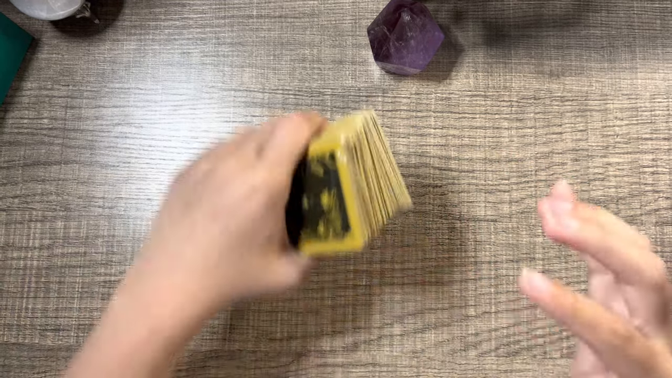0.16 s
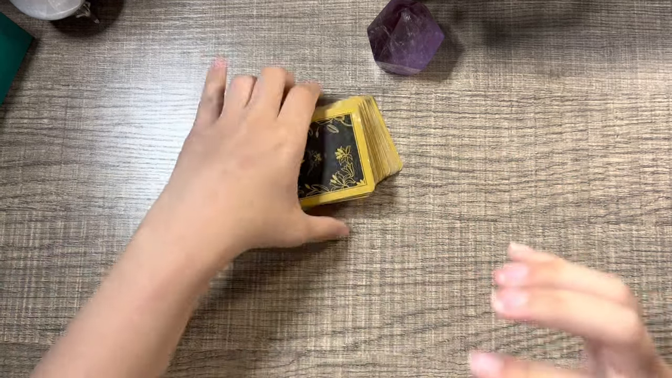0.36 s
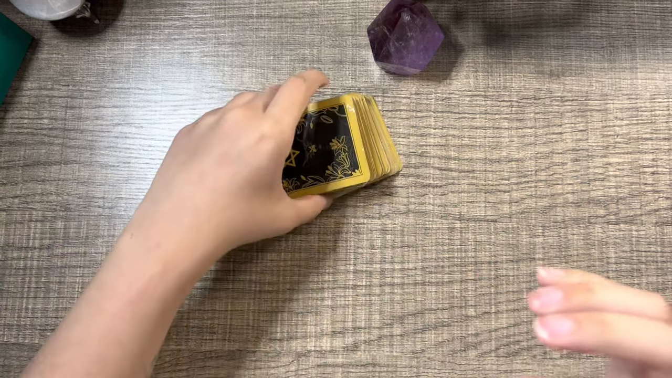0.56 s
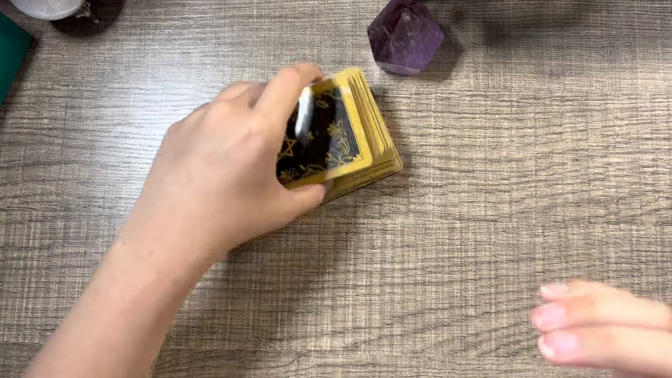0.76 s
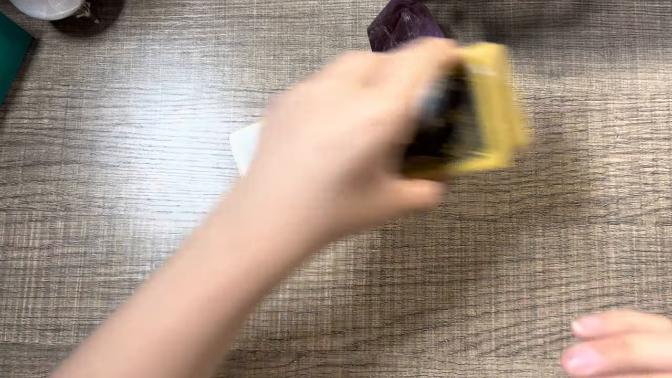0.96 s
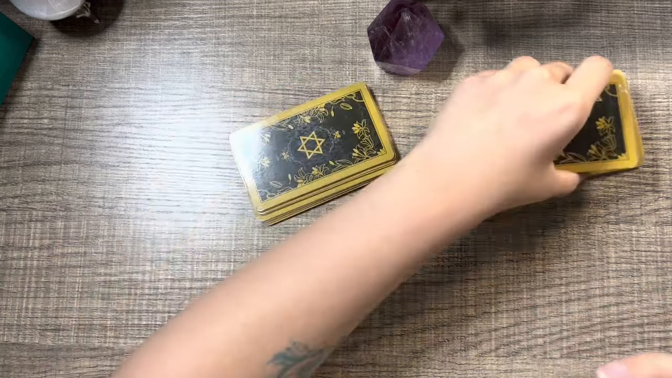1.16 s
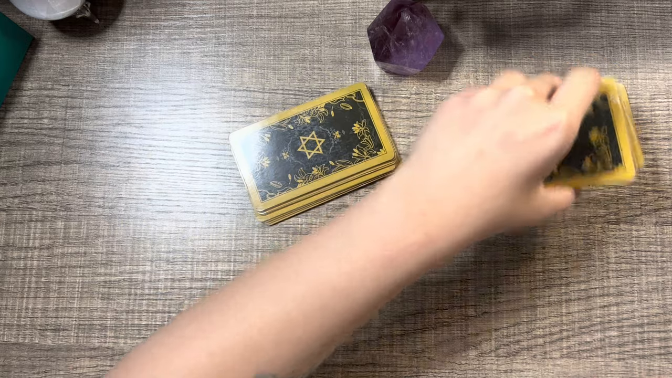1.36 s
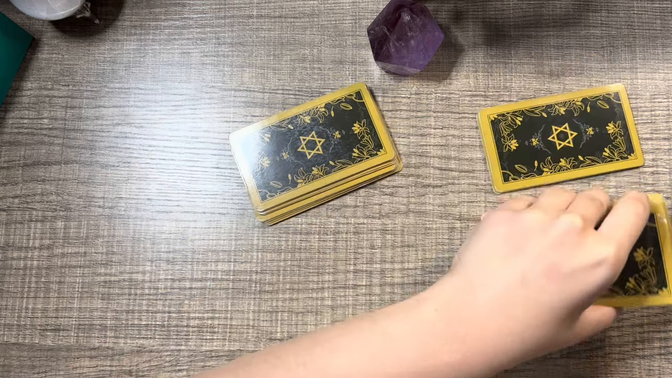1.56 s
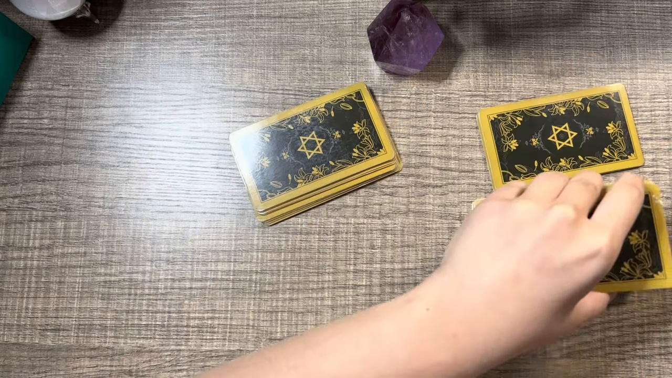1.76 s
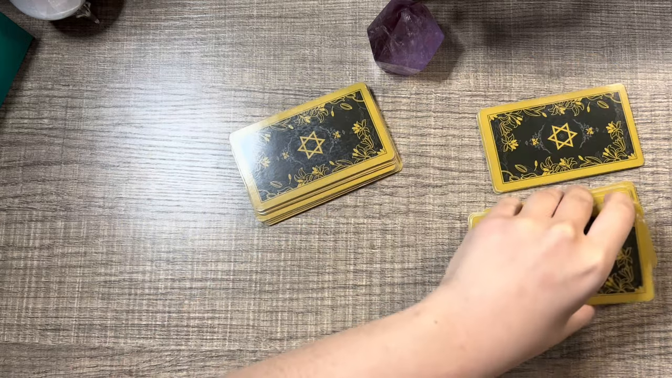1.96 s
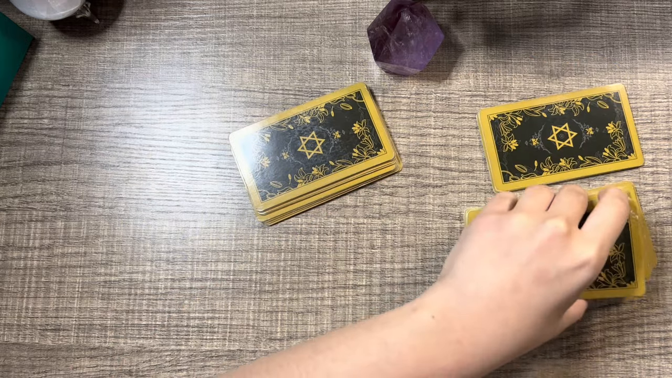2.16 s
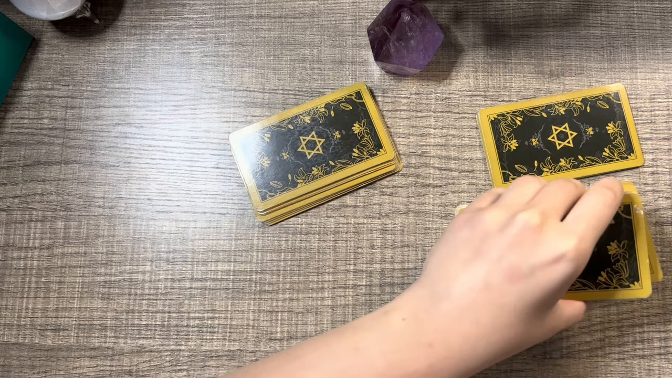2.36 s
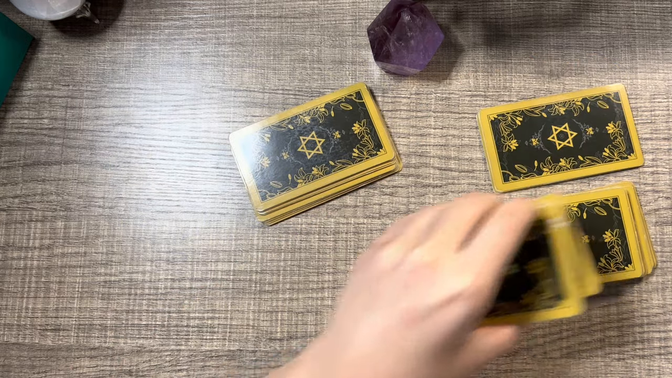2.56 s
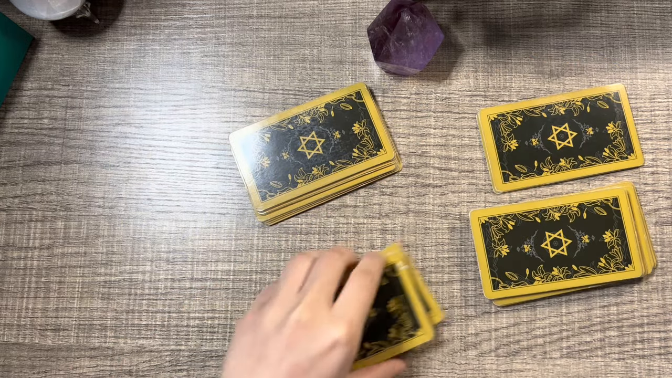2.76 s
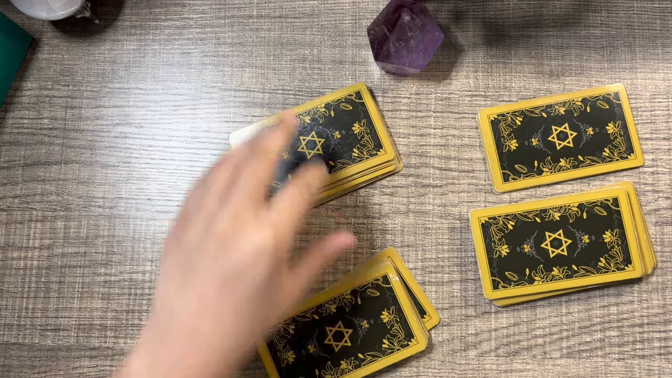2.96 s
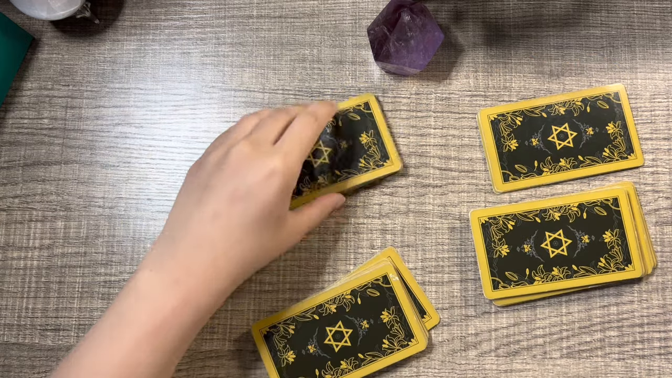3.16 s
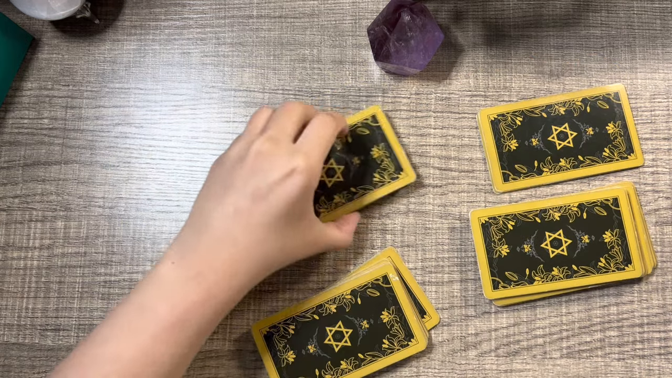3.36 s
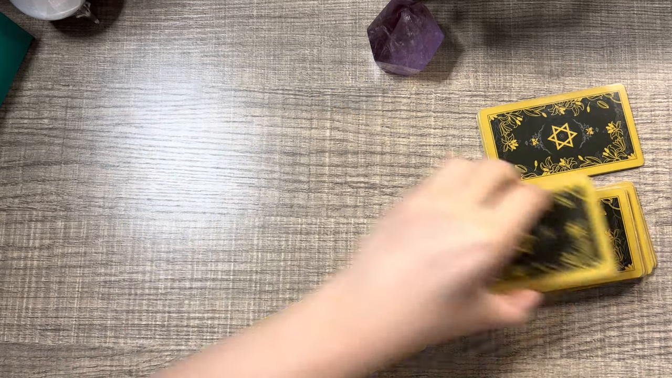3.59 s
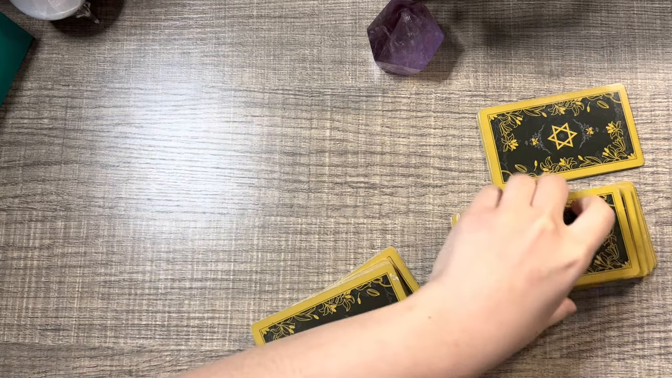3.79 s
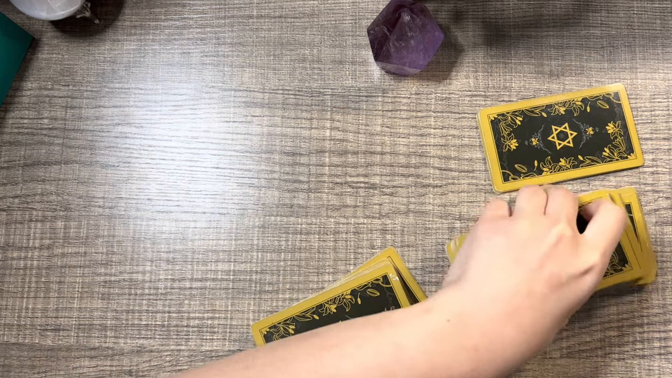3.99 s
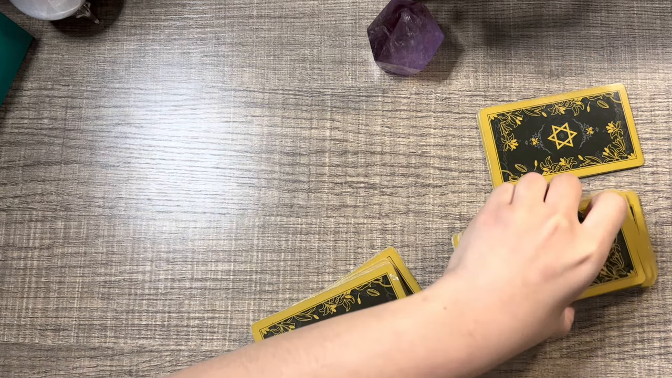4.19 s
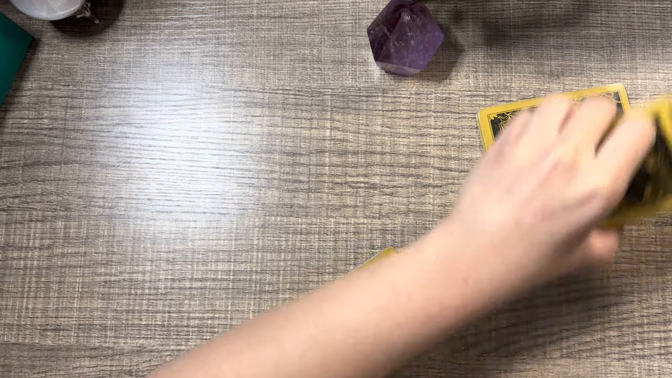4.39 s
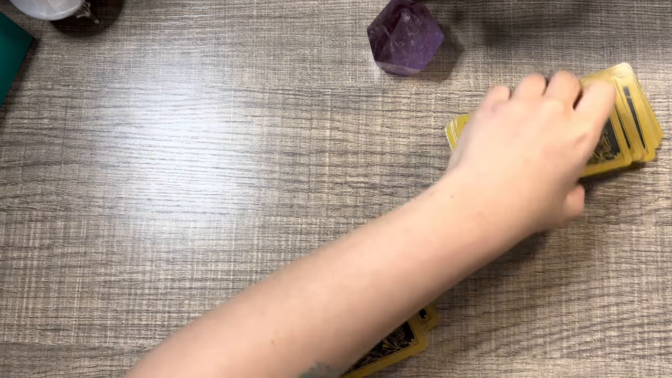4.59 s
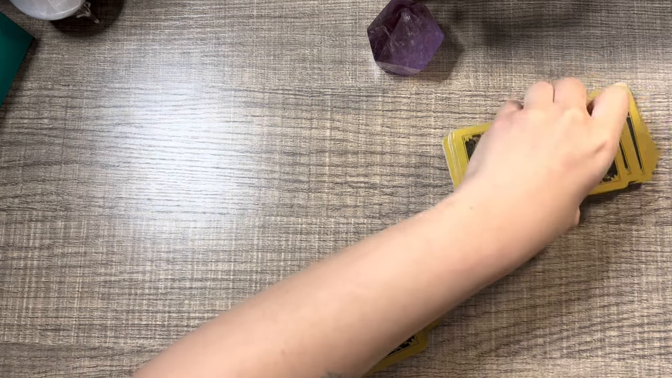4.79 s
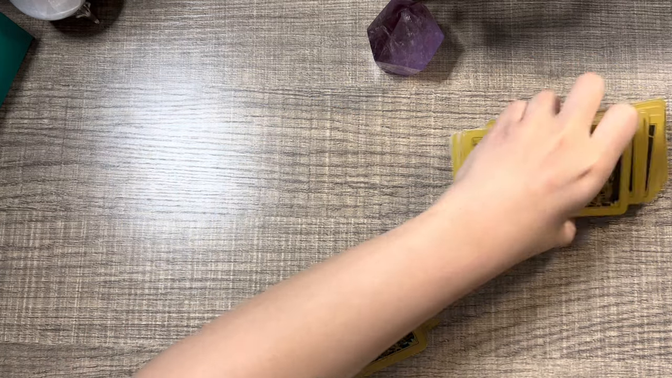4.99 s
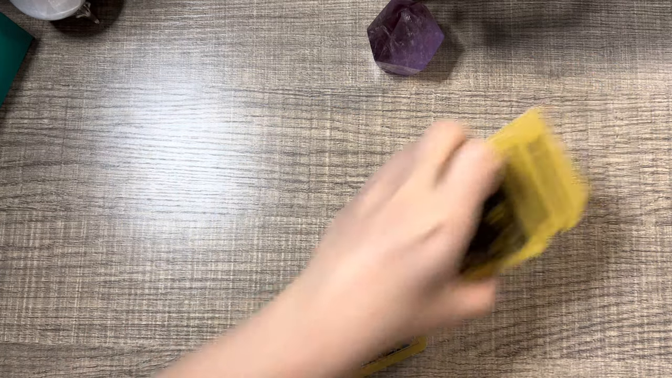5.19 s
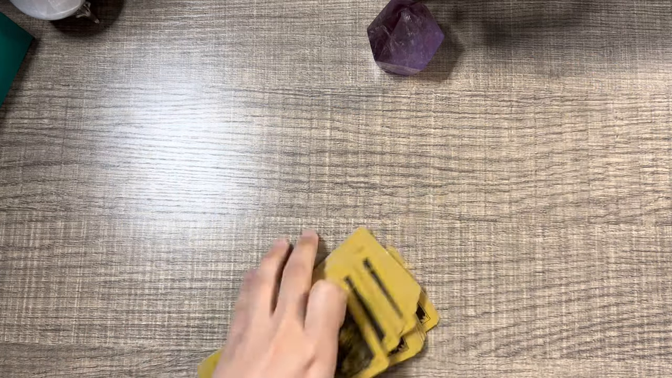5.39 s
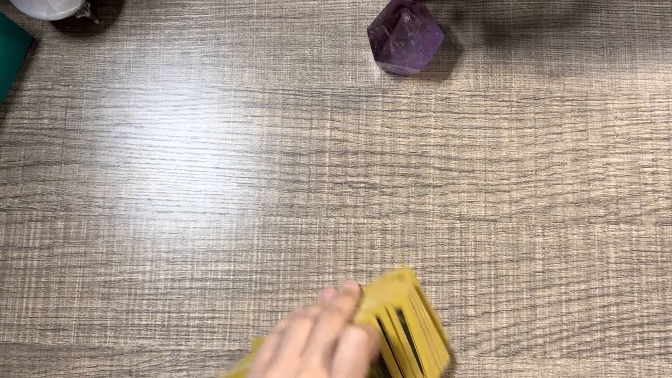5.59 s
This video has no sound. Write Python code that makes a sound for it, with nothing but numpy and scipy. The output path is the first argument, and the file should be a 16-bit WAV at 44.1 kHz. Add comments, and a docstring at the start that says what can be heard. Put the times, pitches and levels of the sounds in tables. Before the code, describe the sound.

Close stereo pickup of playing-card packs handled on a wooden table in a small quiet room. A sharp clack and scrape come first, then isolated slaps as packs are laid down, a near-silent gap, and denser knocks and slides as they are gathered, ending with a strong thud. A faint ventilation hum and low swelling rumble lie behind.

```python
"""Playing cards handled on a wooden tabletop

A hand sets packs of cards down, slides them and gathers them up, close under two microphone ports.
Card edges tick as filtered impulses with a papery noise burst; each pack's weight excites the board's
decaying modes; sliding friction is gritty noise under swelling envelopes; a small room answers with decaying noise.
Behind them a far ventilation fan hums, a low rumble swells, and a faint ring near 1 kHz dies away."""
import sys
import numpy as np
from scipy import signal
from scipy.fft import rfft, irfft, next_fast_len
from scipy.io import wavfile
from scipy.ndimage import uniform_filter1d, map_coordinates

SR = 44100
rng = np.random.default_rng(int(sys.argv[2]) if len(sys.argv) > 2 else 0)


def store_pcm(level_fs):
    """Save levels as 16-bit WAV."""
    pcm = np.round(np.clip(level_fs, -1, 1) * 32767).astype(np.int16)
    wavfile.write(sys.argv[1], SR, np.atleast_2d(pcm).T)


N = 248937  # length in samples
TIME = np.arange(N) / SR  # s

# Card edges meeting wood or card. Each row: start in seconds, snap level in dB,
# treble lift in dB per octave, level of the pack's body in dB, buzz t60 in seconds.
EDGE_TICKS = [(.0526, -46, 6.5, -30, 0.021), (.0827, -46, 10, -32, .012), (.245, -52, -13, -29, 0.013),
              (.276, -37.5, 6, 6, 0.034), (.306, -10.5, -6.5, -8, 0.015), (.3235, -27.5, 4, -14, 0.033),
              (.3633, -34, 32, -25, .018), (.476, -42, -7.5, -4, 0.036), (.5095, -34.5, -6.5, -24, 0.048),
              (.523, -36.5, -11.5, -18, 0.042), (.846, -41, -17.5, 11, 0.014),
              (.859, -26.5, -3.5, -18.5, 0.014), (1.1291, -46, -23, 9, 0.018), (1.144, -12, 4, 6.5, 0.028),
              (1.149, -28.5, -11.5, -9, 0.041), (1.154, -31, -6, 11, 0.018), (1.6451, -29, -3.5, 11, 0.027),
              (1.673, -33, -3.5, -5, 0.017), (2.7708, -24.5, -1.5, -3, 0.028),
              (2.7912, -30.5, -1, -8, 0.014), (2.7966, -24, -5.5, 1.5, 0.017),
              (3.079, -45.5, -11.5, -10, 0.015), (3.124, -34, 11, -8, 0.03), (3.134, -35, 3.5, -15, 0.019),
              (3.144, -29, -4, -21, 0.022), (3.222, -48.5, -8, -8, .02), (3.241, -40, -10.5, -16, 0.039),
              (3.258, -40, -10, -6, .043), (3.6578, -31, -0.5, 6, 0.022), (3.6779, -21.5, 2, -4, 0.029),
              (3.7505, -45.5, -7, -11, 0.032), (3.7745, -44, -8, -6, 0.032), (3.7849, -44, -8, -20, 0.042),
              (3.8361, -36, -12, -23, 0.017), (3.95, -40, -1, -3, .045), (3.968, -31, -1.5, -13, 0.031),
              (3.9856, -35.5, -7, -5, .045), (4.0571, -25.5, -1.5, -6, .035),
              (4.5142, -25.5, -2, -4, 0.051), (4.5192, -21, -15, 13.5, 0.019), (4.533, -34, 1, -7, .031),
              (4.646, -59.5, -7, -10, 0.061), (4.757, -52, -2, 14, .03), (4.784, -35.5, 6.5, -3, 0.028),
              (5.3387, -36.5, -3.5, -5, 0.025), (5.3487, -34.5, 0, -25, 0.032), (5.362, -23, -14, -1, 0.04),
              (5.372, -38, 7, -6, 0.021), (5.381, -32.5, 0.5, -17, 0.031), (5.39, -42, 5, -9, 0.023)]
# The pack's edge on the board. Each row: start in seconds, knock level in dB,
# sharpness in dB (upper modes against the knock), rise in seconds.
PACK_THUDS = [(.28, -18, -14.5, .003), (.305, -24, 7, 0.0027), (0.321, -36, 2, .002),
              (.446, -31, -8, 0.0055), (.487, -35, 0, 0.0046), (.51, -33.5, 4.5, 0.0049),
              (.848, -62, 13, 0.0009), (.859, -60.5, 12.5, 0.00093), (1.148, -45.5, 15, 0.0015),
              (1.651, -32, 3.5, 0.0027), (1.675, -27.5, -8.5, 0.0034), (1.692, -38, -26, .0038),
              (2.776, -28.5, -8, 0.0022), (2.798, -31.5, 2.5, .003), (3.085, -38, 6, 0.0022),
              (3.104, -35, -3, 0.0069), (3.264, -38.5, 12, 0.0042), (3.309, -35.5, 2, 0.0048),
              (3.676, -26, -7, 0.0024), (3.795, -45.5, 4, 0.002), (3.835, -48.5, 8, 0.0032),
              (3.961, -29.5, 1, 0.0058), (3.988, -27.5, -0.5, 0.0029), (4.058, -41, 17.5, 0.0017),
              (4.122, -36.5, -0.5, 0.006), (4.165, -40, 5.5, .0036), (4.521, -22, 2.5, 0.0032),
              (4.53, -24.5, 0.5, 0.0044), (4.65, -43, 9.5, 0.0052), (4.761, -37.5, 6.5, 0.0043),
              (4.803, -26, 8, 0.008), (4.835, -37.5, 6, 0.003), (5.344, -24, -20.5, 0.0091),
              (5.368, -12.5, -5.5, 0.0036), (5.377, -18, -3.5, .004), (5.392, -31, -9, .0022)]
# The hand's full weight bending the top. Each row: start in seconds, lowest modes in dB,
# second modes in dB, rise in seconds.
TOP_BUMPS = [(0.289, -35, -31.5, 0.0053), (.324, -24.5, -38, 0.0086), (0.472, -51, -65, .02),
             (1.689, -35.5, -44, 0.0096), (2.795, -35, -26, .008), (3.683, -30.5, -25.5, 0.013),
             (4.091, -39.5, -46, 0.017), (4.547, -29.5, -57, 0.006), (5.3705, -28, -7.5, .012),
             (5.42, -43.5, -23, 0.011)]
# Cards sliding. Each row: touch in seconds, climb to the peak in seconds, swell in dB, initial fade in
# seconds per 20 dB, scrape peak in dB, then against it fine hiss in dB and the board's shiver in dB.
# The signs of climb, swell and fade are ignored.
CARD_SLIDES = [(.0, 0.053, -5, 0.34, -70.5, -8, -1.5), (0.27, 0.038, 12, 0.0583, -36, -10, 8.5),
               (0.426, 0.083, 22, 0.0158, -42.5, -28, 11), (1.15, .012, 3.5, 0.05, -51, -4.5, 8),
               (1.561, .08, 19, -0.24, -60, -4.5, -5), (1.643, 0.011, 0, 0.03, -47, -15, 9.5),
               (2.15, 0.046, 22, 0.3, -76, -11, 6), (2.405, 0.027, 6, 0.23, -76, -13, 14),
               (2.5, 0.093, 6, -0.2, -75, -8, 10), (2.709, 0.049, 16, -1.4, -62.5, -14.5, 1),
               (2.775, 0.023, 2, -0.1, -56.5, -10, 13), (3.077, 0.027, 12.5, 0.13, -45, -20.5, 4.5),
               (3.111, 0.026, 6, 0.0482, -40, -19, -14), (3.195, 0.065, 7, 0.07, -48, -35, 6),
               (3.285, 0.06, 2, 0.14, -57, -35, 6), (3.685, 0.011, 6, 0.16, -67, -10.5, 14),
               (3.827, 0.0048, 15, 0.08, -50, -41, 0), (3.938, 0.02, 16, 0.0668, -40, -26.5, -10),
               (4.043, .012, 9, 0.0562, -41, -19, 4), (4.14, 0.043, 8, 0.1, -61.5, -42, 19.5),
               (4.515, 0.0154, 6.5, 0.0341, -36.5, -15, 19.5), (4.54, .02, 3, 0.21, -55.5, -26, 10),
               (4.739, 0.054, 16.5, 0.17, -44.5, -23, 7), (4.79, .025, 9, 0.01, -53.5, -20, 24.5),
               (4.92, 0.032, 2.5, 0.13, -58, -1.5, -15), (5.32, 0.047, 20, -0.06, -48, -7, 9),
               (5.379, 0.0089, -1, .035, -52.5, -18, 30.5), (5.47, .04, 11, .4, -71.5, 3.5, 15),
               (5.4, .24, 11.5, -4, -57, -10, -4)]

# Board modes, from the knock upwards. Each row: frequency in Hz, level in dB, t60 in seconds.
KNOCK_MODES = [(154.7, -13.5, 0.25), (188, -11.5, .12), (241.8, -0.5, 0.11)]
HIGH_KNOCK_MODES = [(282.6, -9.5, 0.081), (317.4, 0, .11), (352.4, -7.5, 0.072), (378.6, -4, 0.097)]
UPPER_MODES = [(479.2, -1, .1), (563.6, 1.5, 0.064), (677, 1.5, 0.049), (787.3, -3.5, 0.064),
               (930, -8.5, 0.074), (1009, -5, 0.06), (1393, -10.5, 0.078), (1897, -11.5, 0.081)]
# Bending modes of the whole top: a close pair that beats, then the next modes.
# Each row: frequency in Hz, level in dB, t60 in seconds.
LOWEST_MODES = [(62.5, 0, .7), (66, -2, .6)]
SECOND_MODES = [(108.4, 7, .12), (83.6, -14.5, 0.088)]
# Resonances of the pack of cards. Each row: frequency in Hz, width in Hz, level in dB.
PACK_BODY = [(1640, 1100, -5), (2110, 500, 5.5), (2580, 620, -7)]

# Spectra of a card's snap, of coated card on card, of skin on coated card, and of the fan's air noise.
# Each row: frequency in Hz, relative spectral level in dB.
SNAP_COLOUR = [(300, -30.5), (600, 2.5), (1200, -2.5), (2500, -2.5), (3500, -4.5), (5000, -2), (8000, -0.5),
               (9700, -8.5), (12500, -5), (15500, -12.5), (16400, -36.5)]
SCRAPE_COLOUR = [(260, -40), (450, 2.5), (791, -8), (1210, -11.5), (1460, -10.5), (2030, -13.5),
                 (2570, -11.5), (5730, -22), (9000, -32.5), (11700, -63.5), (19800, -120)]
HISS_COLOUR = [(3500, -40), (6000, -12), (9000, -7.5), (10500, -16.5), (11800, -2.5), (13000, -11.5),
               (15200, -8.5), (16000, -13.5), (16400, -30)]
AIR_COLOUR = [(20, -33), (30, -32.5), (52, -9), (90, -16), (125, -9.5), (150, -19), (185, -20.5),
              (240, -25), (520, -29), (685, -43.5), (1000, -36.5), (2100, -40), (2900, -54.5), (5000, -60),
              (12000, -65), (15500, -67.5), (16400, -68.5)]

# Lifts in the air noise. Each row: frequency in Hz, width in Hz, lift in dB.
DUCT_LIFTS = [(514, 56, 6), (985, 60, 1.5), (1450, 47, 5), (1890, 140, 6)]
# Motor hum. Each row: frequency in Hz, width of its noise part in Hz, rms level in dB.
MOTOR_HUM = [(120.8, 59, -52.5), (240.7, 6.1, -68), (62, 13.3, -69)]
# The swelling rumble. Each row: time in seconds, low note in dB rms, drone in dB rms.
RUMBLE_LEVELS = [(0, -47.5, -62), (.4, -67, -71), (1.5, -68.5, -67.5), (1.8, -52.5, -61.5),
                 (2.17, -45.5, -52), (2.4, -57, -58.5), (2.55, -46.5, -50.5), (2.72, -43.5, -61),
                 (2.9, -54, -57), (3.4, -52.5, -66.5), (4.0, -51, -52.5), (4.3, -67, -60.5),
                 (5.2, -59.5, -66), (5.48, -37.5, -58), (5.64, -56, -63)]
# Correlation of the air noise, then of the room. Each row: frequency in Hz, left-right likeness (1 is identical).
AIR_ALIKE = [(60, 1), (150, 0.99), (380, 0.55), (950, 0.17), (2380, 1), (5980, 0.5), (15000, 0.15)]
ROOM_LIKENESS = [(200, 0.97), (400, 1), (650, 0.075), (1200, 0.16), (2000, 0.99), (4000, 0.2), (8000, .15)]
# Decay of the room. Each row: frequency in Hz, t60 in seconds.
ROOM_DECAY = [(100, 0.12), (500, 0.33), (2000, 0.2), (6000, 0.2), (14000, 0.12)]
# The microphone ports. Each row: frequency in Hz, phase lead of the left in radians, left-right balance in dB.
MIC_PORTS = [(90, 0, 0), (250, .03, -.4), (600, .55, 1.8), (950, -.55, .2), (1500, .15, .2), (3600, .4, .4),
             (4600, -.3, .4), (6000, -1.35, 0), (12000, -1.5, 0), (15500, -1.7, 0)]

# Buzz level: dB against a full-scale snap, dB gained per dB of softer snap, dB gained per second of buzz t60
BUZZ_DB, BUZZ_LAGS, BUZZ_PER_S = -20, .2, 150
# Upper modes: dB against the knock, dB per dB of sharpness, dB lost per ms of rise beyond 3 ms
UPPER_UNDER_DB, UPPER_GROWS, SLOW_DULLS_DB = -11.5, 0.89, 1
TOUCH_S = 0.0059  # onset of friction
BRAKE = 0.66  # the fade steepens as the cards come to rest
HISS_STEEP, SHIVER_STEEP = 1.3, 1.5  # how much wider than the scrape their levels swing
SCRAPE_CRACKLE, HISS_CRACKLE = 2.2, .5  # mean size of the catches against the rubbing noise
FAN_DB, FAN_SWAY_DB = -55, 1.2  # rms level before the sway, scale of the sway
LOW_NOTE, DRONE = (84, 16), (174.3, 82)  # the rumble's two bands: Hz, width in Hz
RING_HZ, RING_DB, RING_T60_S = 1010, -63, 4.5  # the sine's starting amplitude is given in dB
BASS_HZ, TOP_HZ = 37.5, 16850  # the microphone fades below the first and passes nothing from the second up


def amp(db):
    """Decibels become an amplitude ratio."""
    return 10 ** (np.asarray(db) / 20)


def unit(x):
    """Normalisation to an rms of 1."""
    return x / np.sqrt(np.mean(x ** 2) + 1e-20)


def along(points, hz):
    """Interpolation of (Hz, value) points on a logarithmic frequency axis."""
    f, v = np.transpose(points)
    return np.interp(np.log(hz + 1), np.log(f + 1), v)


def wobble(rate):
    """Spline interpolation of random knots, rate per second, gives a smooth curve."""
    knots = rng.standard_normal(int(N * rate / SR) + 4)
    return map_coordinates(knots, [TIME * rate])


def filtered(x, response):
    """Linear filtering: the spectrum is multiplied by a response of frequency."""
    m = next_fast_len(x.shape[-1] + 8192)
    hz = np.fft.rfftfreq(m, 1 / SR)
    return irfft(rfft(x, m) * response(hz), m)[..., :x.shape[-1]]


def resonance(f, hz, width_hz):
    """A resonance peak: 1 at its centre, one half at half its width to either side."""
    return 1 / (1 + (2 * (f - hz) / width_hz) ** 2)


def band(hz, width_hz):
    """A resonance selects a band from white noise, here of rms 1."""
    return unit(filtered(rng.standard_normal(N), lambda f: resonance(f, hz, width_hz)))


def spread(pair, alike):
    """Correlation: two unrelated noises, mixed as mid and side, give channels of a set likeness."""
    def mix(hz):
        turn = np.arccos(np.clip(along(alike, hz), -1, 1)) / 2
        return np.array([np.cos(turn), np.sin(turn)])
    mid, side = filtered(pair, mix)
    return np.array([mid + side, mid - side])


def causal_colour(magnitude):
    """Minimum phase: folding the cepstrum makes an impulse response that packs its energy early."""
    ceps = irfft(np.log(magnitude))
    ceps[1:512] *= 2
    ceps[513:] = 0
    return irfft(np.exp(rfft(ceps)))


def ticks():
    """Impulse excitation: each edge gives a sharp snap and a short papery buzz, and rings the pack."""
    out, t = np.zeros(N + SR), np.arange(SR // 8) / SR
    hz = np.fft.rfftfreq(1024, 1 / SR)
    pack = sum(amp(db) * resonance(hz, centre, width) for centre, width, db in PACK_BODY)
    octaves = np.clip(np.log2((hz + 300) / 5000), -.8, 1.6)
    for s, db, lift_db, body_db, t60 in EDGE_TICKS:
        snap = amp(along(SNAP_COLOUR, hz) + lift_db * octaves)
        colour = causal_colour(snap + amp(body_db) * pack + 1e-6)
        buzz_db = BUZZ_DB - BUZZ_LAGS * db + BUZZ_PER_S * t60
        touch = 0.0049 * amp(buzz_db)  # s; a flat, buzzy landing closes slowly
        decay = amp(buzz_db - 60 * t / abs(t60))
        burst = decay * (1 - np.exp(-t / touch)) * rng.standard_normal(len(t))
        burst[round(.6 * touch * SR)] = 1  # the edge snaps shut
        tick = signal.fftconvolve(burst, colour / np.abs(colour).max())[:len(t)]
        out[round(s * SR):][:len(t)] += amp(db) * tick
    return out[:N]


def ring(blows):
    """Modal superposition: each blow (s, rise s, [(modes, dB)]) is a sum of decaying sines."""
    out, t = np.zeros(N + SR), np.arange(SR // 2) / SR
    for s, rise, groups in blows:
        onset = 1 - np.exp(-t / max(rise, 3e-4))
        for modes, db in groups:
            for hz, level_db, t60 in modes:
                start = rng.uniform(-1.05, 1) * min(hz / 250, 2.5)  # higher modes start out of step
                decay = amp(db + level_db + rng.normal(0, 1.77) - 60 * t / t60)
                swing = decay * np.sin(2 * np.pi * hz * t + start)
                out[round(s * SR):][:len(t)] += swing * onset
    return out[:N]


def thuds():
    """Contact stiffness: a sharper landing gives the upper modes a larger share."""
    blows = []
    for s, db, sharp_db, rise in PACK_THUDS:
        dull_db = SLOW_DULLS_DB * (1000 * rise - 3)
        upper_db = db + UPPER_UNDER_DB + UPPER_GROWS * sharp_db - dull_db
        groups = [(KNOCK_MODES, db), (HIGH_KNOCK_MODES, db + sharp_db), (UPPER_MODES, upper_db)]
        blows.append((s, rise, groups))
    return ring(blows)


def bumps():
    """Plate bending: the hand's weight sets the slowest modes of the whole top swinging."""
    return ring([(s, rise, [(LOWEST_MODES, low_db), (SECOND_MODES, second_db)])
                 for s, low_db, second_db, rise in TOP_BUMPS])


def patchy(colour, patchy_db, crackle):
    """Friction noise of rms 1: sparse catches in steady rubbing, with resonances shifting as cards bend."""
    catches = (rng.random(N) < 500 / SR) * rng.exponential(crackle, N)  # card edges that catch, 500 per s
    z = signal.stft(rng.standard_normal(N) * (1 + catches), nperseg=256)[2]
    field = uniform_filter1d(rng.standard_normal(z.shape), 3, 0)  # smooth over frequency
    field = uniform_filter1d(field, 6, 1)  # smooth over time
    noise = signal.istft(z * amp(patchy_db * unit(field)), nperseg=256)[1][:N]
    return unit(filtered(noise, lambda hz: amp(along(colour, hz))))


def slides():
    """Stick-slip friction: gritty noise in the card's colour, and a shiver that drives the board's modes."""
    scrape, hiss, shiver = np.zeros((3, N))
    for s, climb, swell_db, fade, db, hiss_db, shiver_db in CARD_SLIDES:
        climb, fade = abs(climb), abs(fade)
        late = TIME - s - climb  # s after the peak
        climb_db = abs(swell_db) * late / climb
        fade_db = -20 * late / fade * (1 + BRAKE * late / fade)
        under_db = np.where(late < 0, climb_db, fade_db)
        stroke = amp(db) * np.clip((TIME - s) / TOUCH_S, 0, 1)
        scrape += stroke * amp(under_db)
        hiss += stroke * amp(hiss_db + HISS_STEEP * under_db)
        shiver += stroke * amp(shiver_db + SHIVER_STEEP * under_db)
    grit = unit(amp(2.0 * wobble(64) + 1.5 * wobble(600)))  # catching and slipping
    # a faster decay means a wider resonance
    board = unit(sum(amp(db) * band(hz, 2.77 / t60) for hz, db, t60 in KNOCK_MODES + HIGH_KNOCK_MODES))
    rubbing = grit * scrape * patchy(SCRAPE_COLOUR, patchy_db=3.5, crackle=SCRAPE_CRACKLE)
    fine = hiss * patchy(HISS_COLOUR, patchy_db=3.0, crackle=HISS_CRACKLE)
    return rubbing + fine + shiver * board


def room(x):
    """Reverberation: convolution with noise in which each frequency dies at its own speed."""
    noise = spread(rng.standard_normal((2, SR // 2)), ROOM_LIKENESS)
    hz, t, z = signal.stft(noise, SR, nperseg=256)
    decay = amp(-60 * t / along(ROOM_DECAY, hz)[:, None])
    tail = signal.istft(z * decay, SR, nperseg=256)[1]
    delayed = np.pad(x, (150, 0))  # samples before the answer begins
    return signal.fftconvolve(delayed[None], tail / np.linalg.norm(tail[0]), axes=1)[:, :N]


def fan_air():
    """Flow noise: broadband noise lifted by resonances, partly alike in both ears, its level swaying."""
    def colour(f):
        lifts_db = sum(db * resonance(f, hz, width) for hz, width, db in DUCT_LIFTS)
        return amp(along(AIR_COLOUR, f) + lifts_db)
    air = spread(filtered(rng.standard_normal((2, N)), colour), AIR_ALIKE)
    return amp(FAN_DB + FAN_SWAY_DB * wobble(3.1)) * unit(air)


def fan_hum():
    """Tonal motor noise: steady sines, each with a little narrow-band noise around it."""
    return sum(amp(db) * (1.3 * np.sin(2 * np.pi * hz * TIME) + 0.38 * band(hz, width))
               for hz, width, db in MOTOR_HUM)


def rumble():
    """Amplitude modulation: two low noise bands swell and sink independently."""
    s, low_db, drone_db = np.transpose(RUMBLE_LEVELS)
    low = amp(np.interp(TIME, s, low_db)) * band(*LOW_NOTE)
    return low + amp(np.interp(TIME, s, drone_db)) * band(*DRONE)


def faint_ring():
    """Exponential decay: a sine with a trace of noise around it dies away from the start."""
    tone = np.sin(2 * np.pi * RING_HZ * TIME) + 0.17 * band(RING_HZ, 30)
    return amp(RING_DB - 60 * TIME / RING_T60_S) * tone


def scene():
    """Superposition: cards and tabletop, the room's answer to ticks, thuds and slides, and the background."""
    table = ticks() + thuds() + slides()
    background = fan_air() + fan_hum() + rumble() + faint_ring()
    return table + bumps() + amp(-10.5) * room(table) + background


def record(dry):
    """Transduction: two ports differ in phase and level by frequency, within the microphone's band."""
    hz, lead, balance_db = np.transpose(MIC_PORTS)
    half = np.array([[.5], [-.5]])  # left and right share each difference

    def response(f):
        phase = np.exp(1j * half * np.interp(f, hz, lead))
        level = amp(half * np.interp(f, hz, balance_db))
        bass_fade = 1 / np.sqrt(1 + (BASS_HZ / (f + 1)) ** 4)
        return phase * level * (f < TOP_HZ) * bass_fade
    return filtered(dry, response)


dry = scene()
out = record(dry)
store_pcm(out)
```